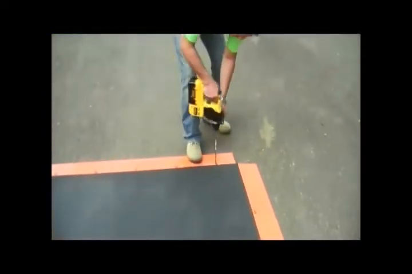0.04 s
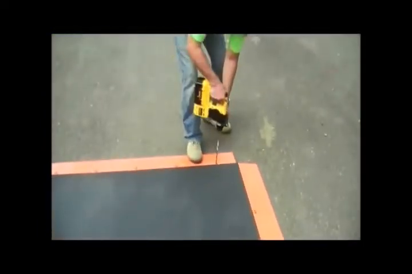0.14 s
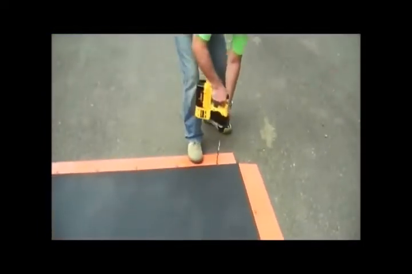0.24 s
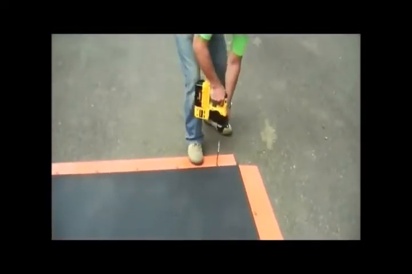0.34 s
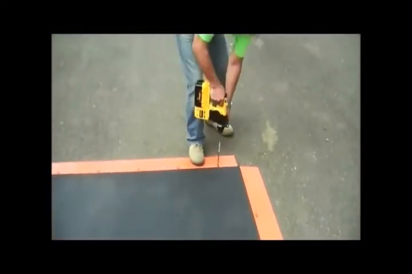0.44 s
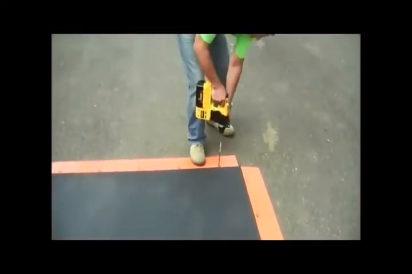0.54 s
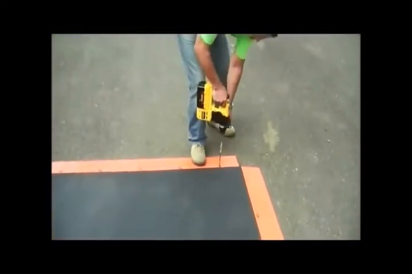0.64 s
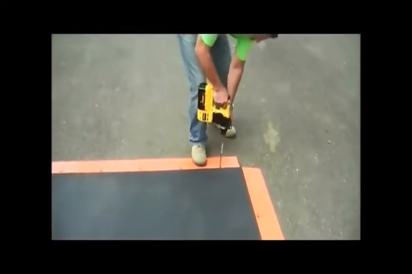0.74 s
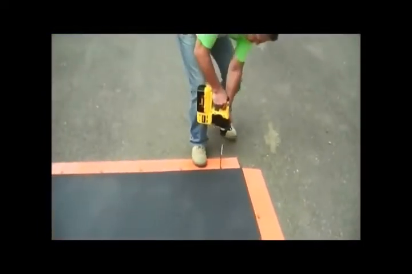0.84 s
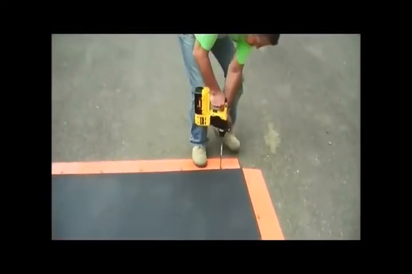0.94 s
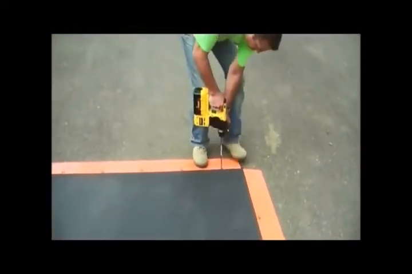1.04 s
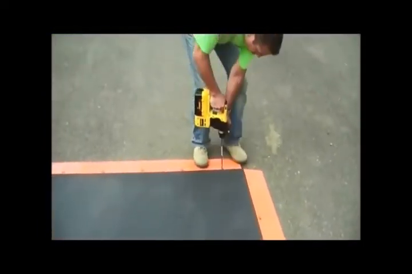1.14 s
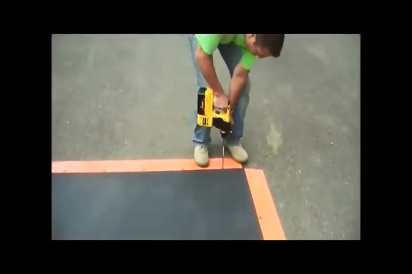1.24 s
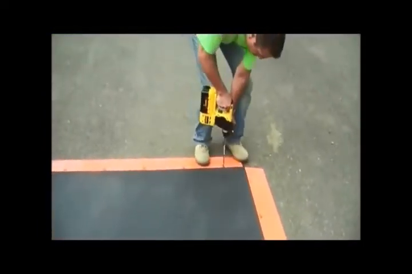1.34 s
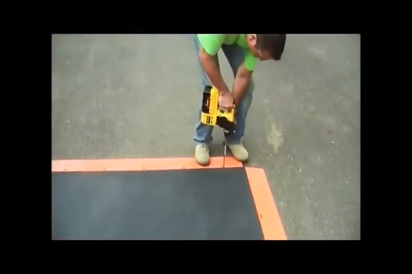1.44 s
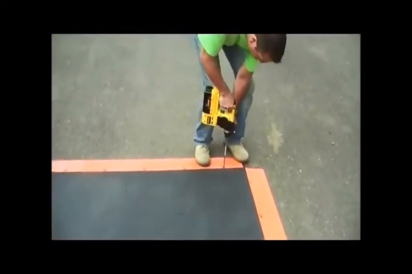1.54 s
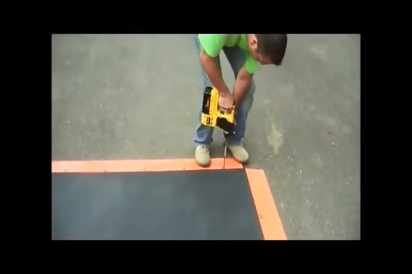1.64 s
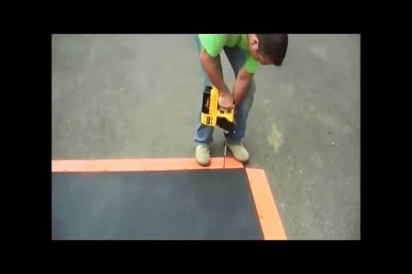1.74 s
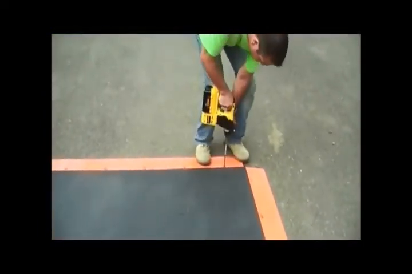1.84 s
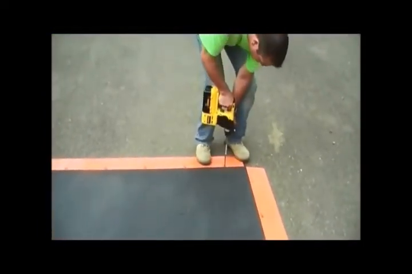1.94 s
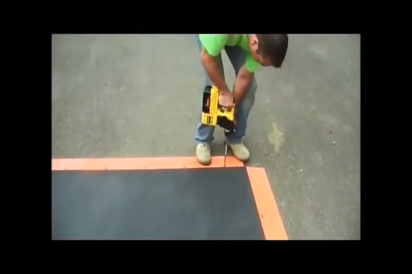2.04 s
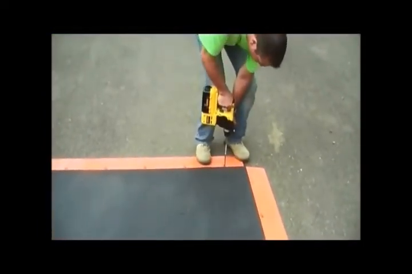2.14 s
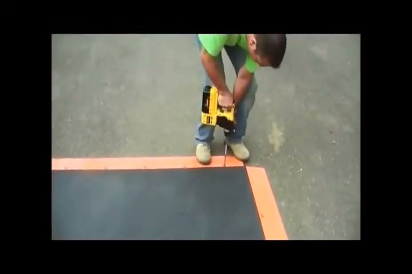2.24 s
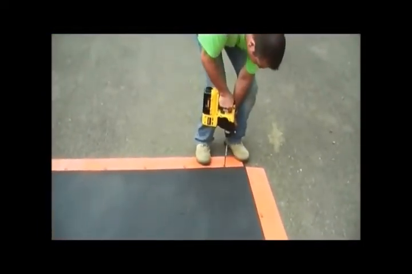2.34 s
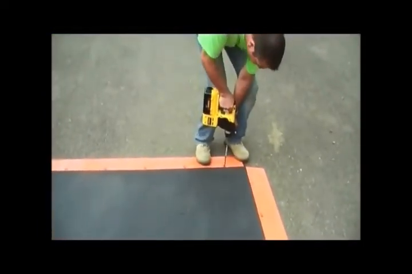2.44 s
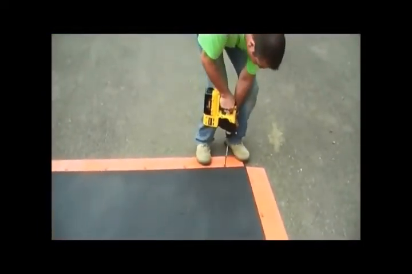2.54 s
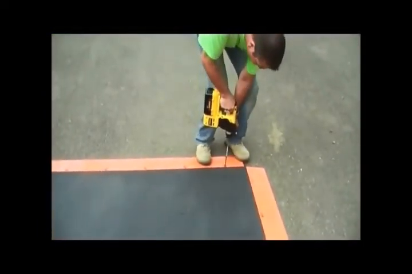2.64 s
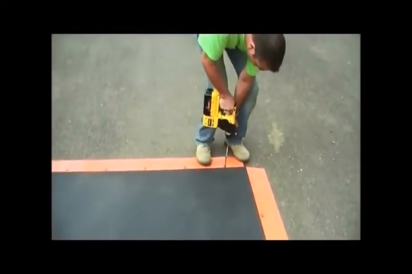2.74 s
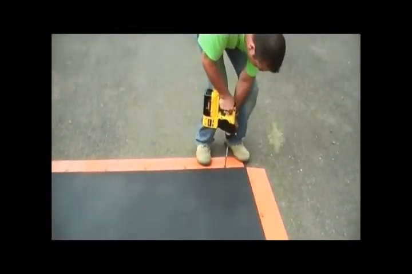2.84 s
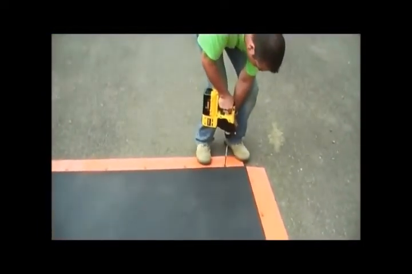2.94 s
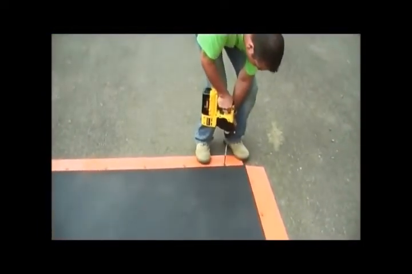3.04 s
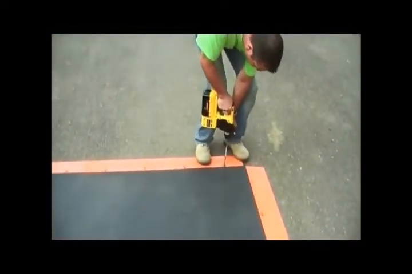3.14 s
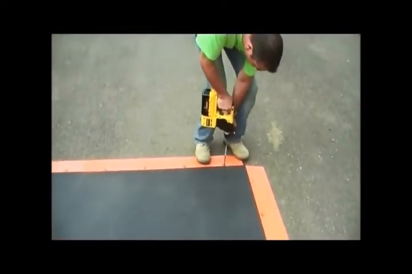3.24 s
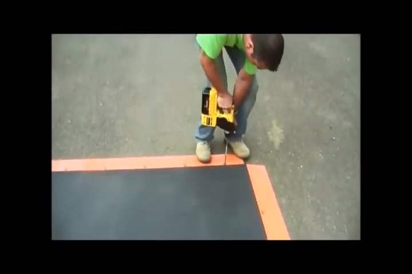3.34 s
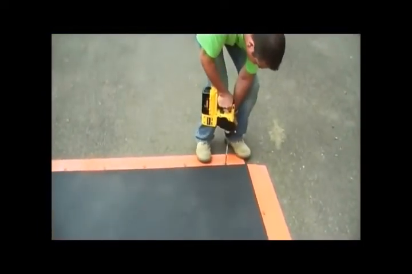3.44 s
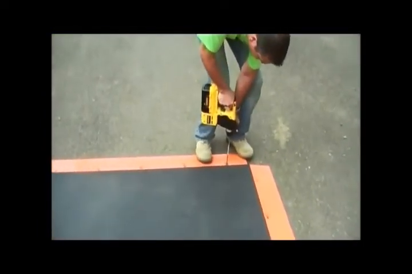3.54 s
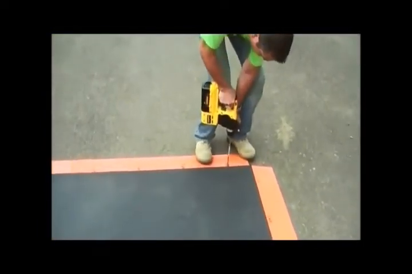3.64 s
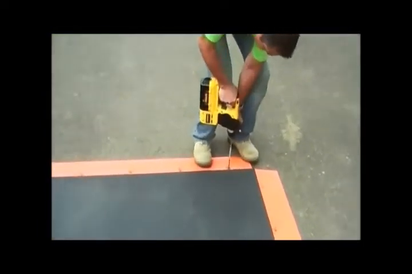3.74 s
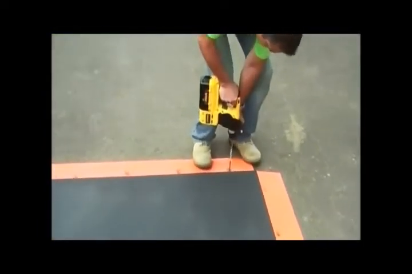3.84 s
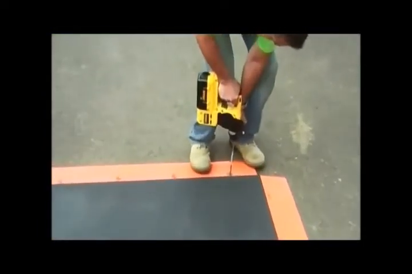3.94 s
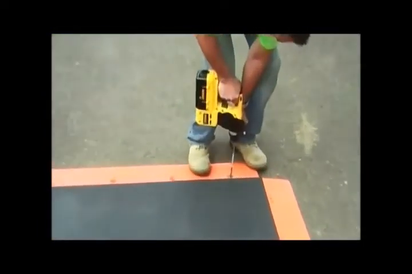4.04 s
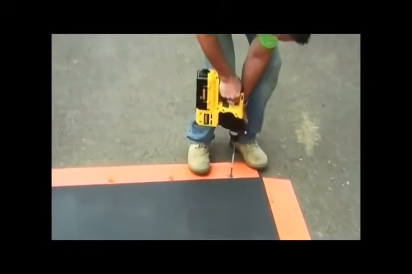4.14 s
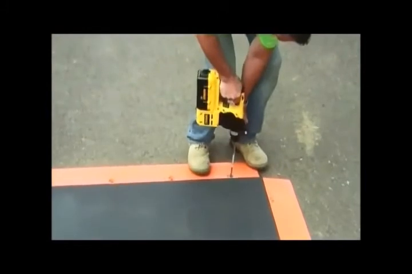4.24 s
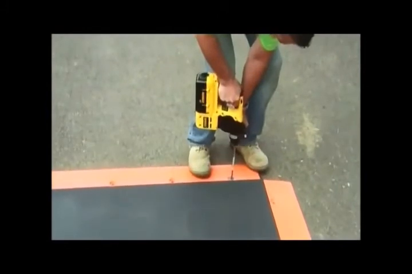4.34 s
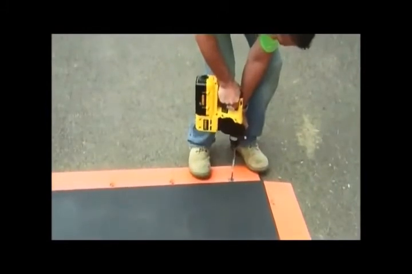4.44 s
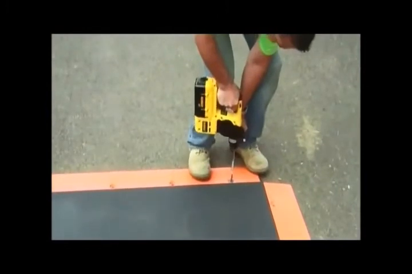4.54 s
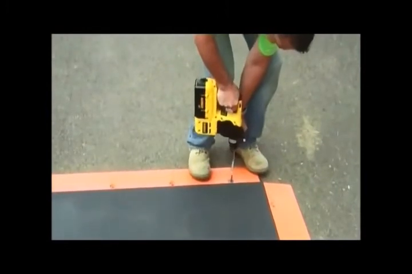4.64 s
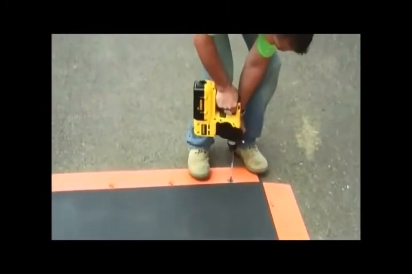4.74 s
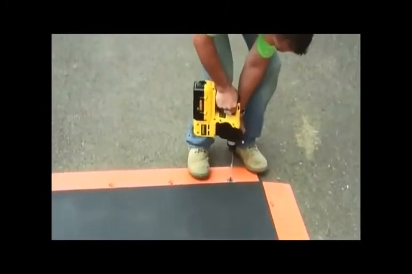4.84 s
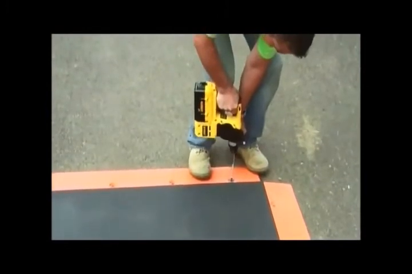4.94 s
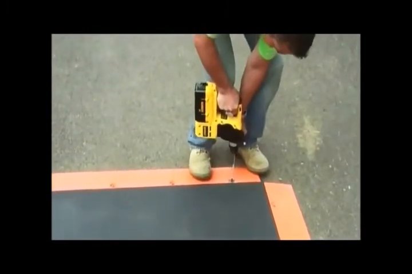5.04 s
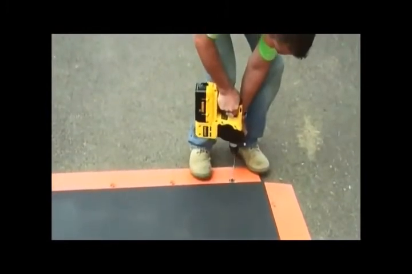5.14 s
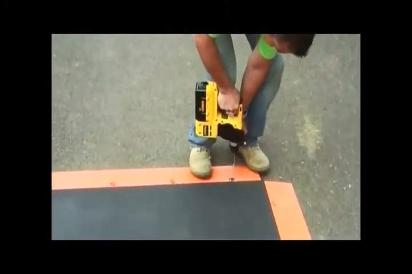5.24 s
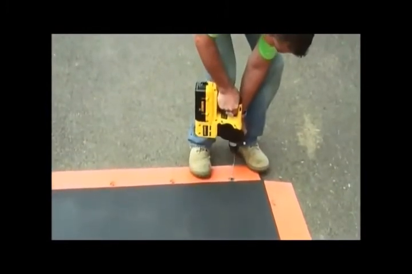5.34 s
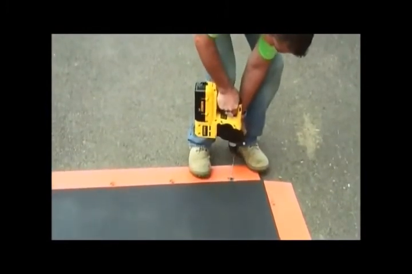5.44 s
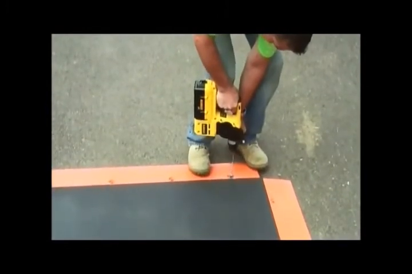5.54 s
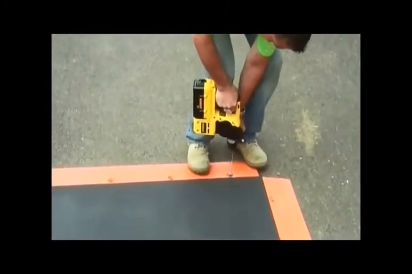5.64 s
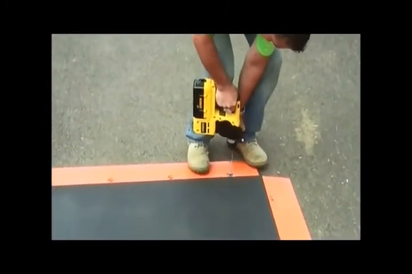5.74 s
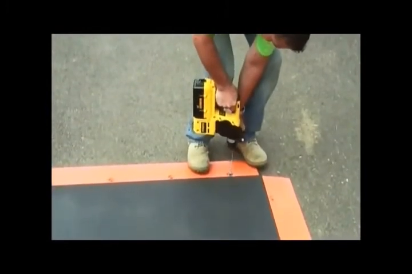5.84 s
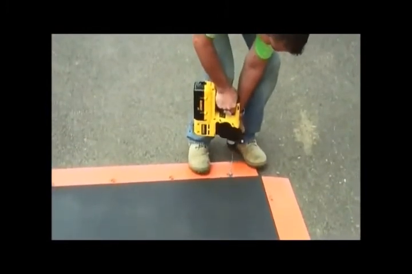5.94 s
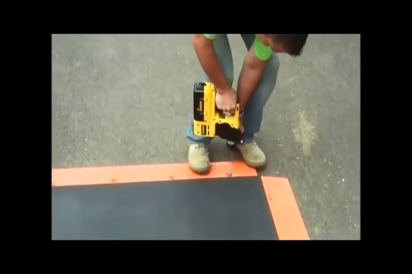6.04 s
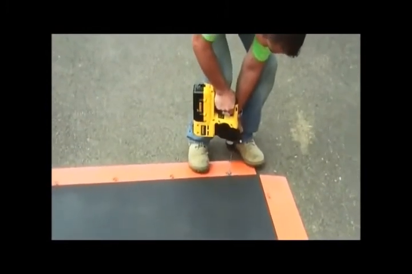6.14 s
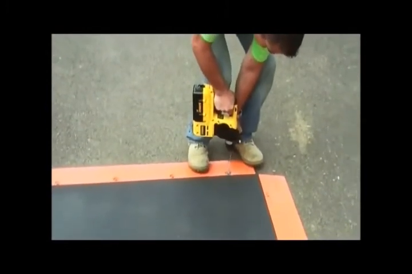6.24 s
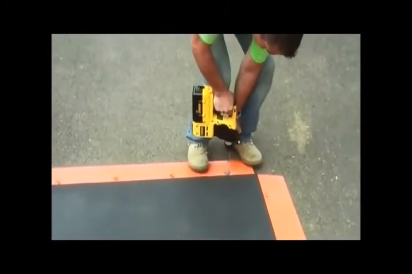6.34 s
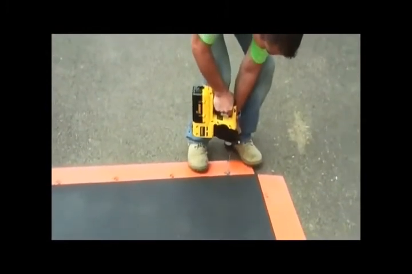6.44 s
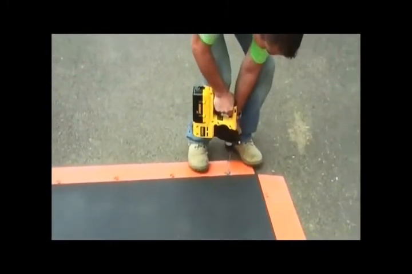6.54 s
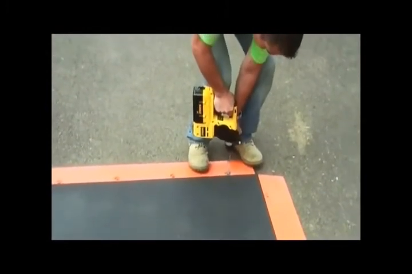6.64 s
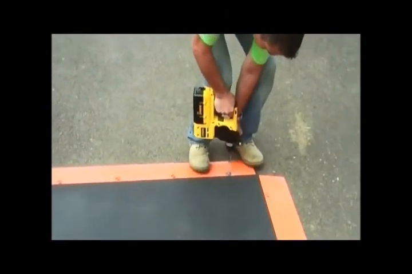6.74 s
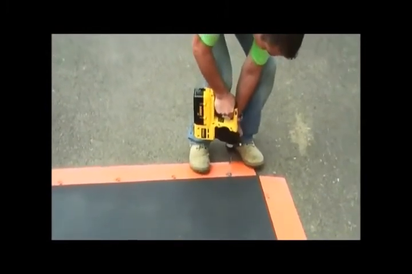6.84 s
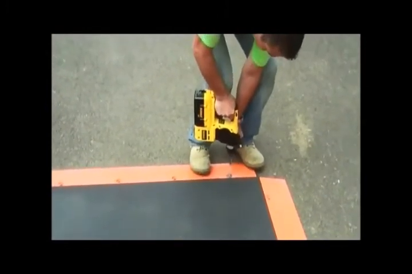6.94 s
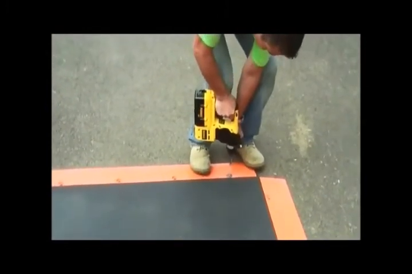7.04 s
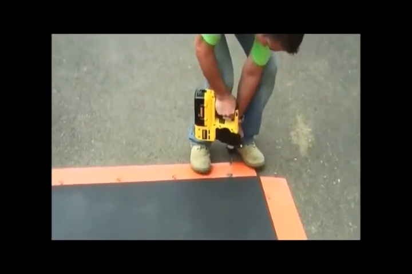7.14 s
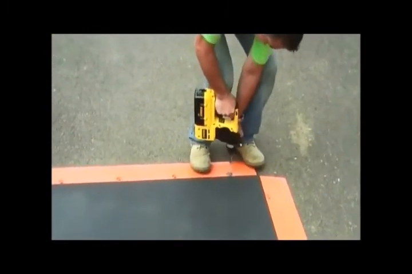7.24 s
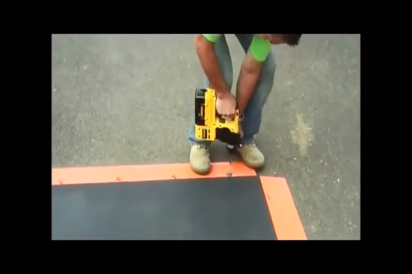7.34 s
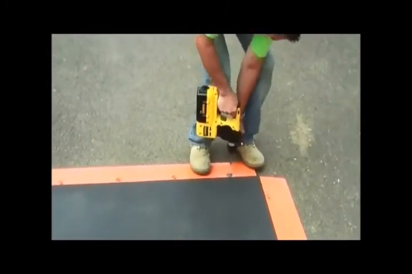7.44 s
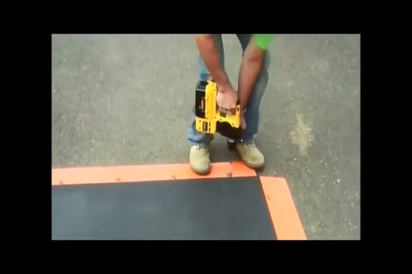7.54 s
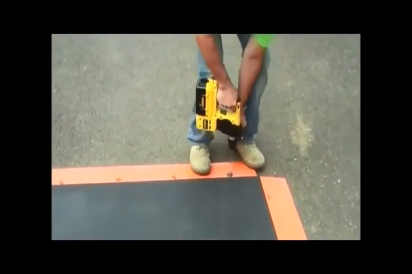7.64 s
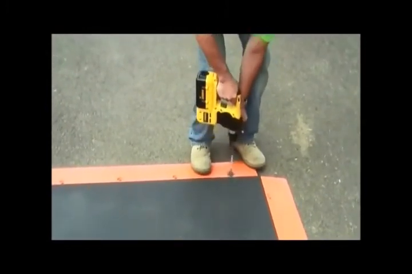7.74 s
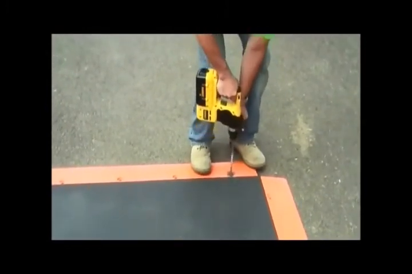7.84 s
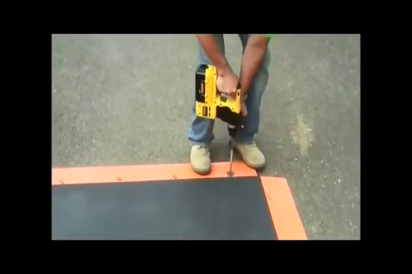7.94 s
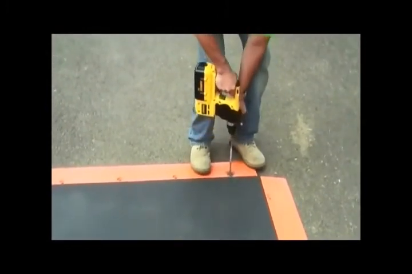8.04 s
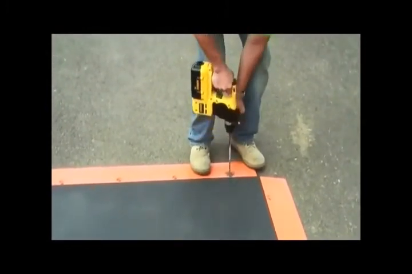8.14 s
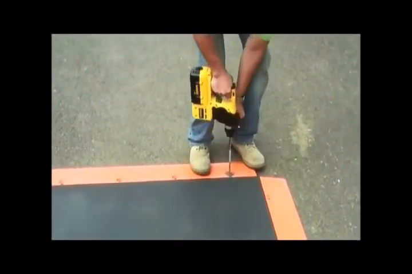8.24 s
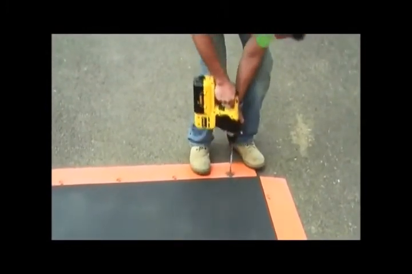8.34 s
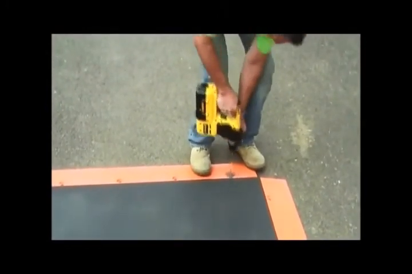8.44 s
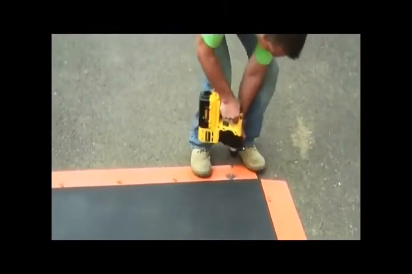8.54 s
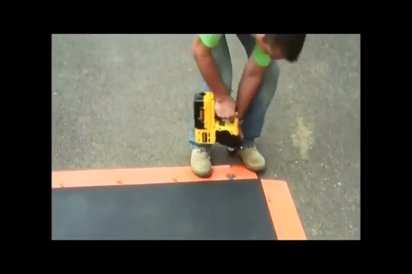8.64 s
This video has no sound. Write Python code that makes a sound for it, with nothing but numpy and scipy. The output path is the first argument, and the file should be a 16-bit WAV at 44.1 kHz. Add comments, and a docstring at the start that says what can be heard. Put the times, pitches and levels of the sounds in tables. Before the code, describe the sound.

Outdoors, close stereo: small metal ticks, one quick motor blip with a thin coasting whistle, then continuous hammer drilling into hard pavement. Buzzing blows start sharp and chip stone, becoming duller and grittier with depth. A brief choking lurch drops the motor speed before steady deep grinding. The bit lifts with a rising whir and clinks, knocks the rim, and scrapes squealing back in, still running at the end.

```python
"""Hammer drill in pavement, outdoors

A cordless hammer drill bores into pavement, close by, heard in stereo. After a few ticks and a blip of the trigger
the hammer cracks away at the surface: noise bursts, one a turn, over a filtered thud and surging grit. The blows dull
as the bit sinks; it binds and nearly stalls, grinds on deeper, and speeds up as it is drawn out and pushed back to
clear the dust. Noise and blows ring the bit's resonances, gears whine as sines through the housing's filter,
the ground scatters the sound by short noise tails, and a soft wash of filtered noise lies behind.
"""
import sys
import numpy as np
from scipy import signal
from scipy.fft import rfft, irfft
from scipy.io import wavfile
from scipy.ndimage import uniform_filter1d

SR = 44100
rng = np.random.default_rng(int(sys.argv[2]) if len(sys.argv) > 2 else 0)


def inscribe(sig):
    """Save sig as 16-bit PCM at rate SR to the path in sys.argv[1].

    A 1-D sig is mono; a 2-D sig holds one channel per row.
    Samples are clipped to [-1, 1] before scaling.
    """
    pcm = np.round(np.clip(np.atleast_2d(sig).T, -1, 1) * 32767)
    wavfile.write(sys.argv[1], SR, pcm.astype(np.int16))


N = 383669
TIME = np.arange(N) / SR  # seconds

# Motor under the changing load, before run-up and stall. Each row: time in s, hammer blows per s.
SPEED = [(1.1, 45.92), (1.34, 78.43), (1.56, 74.31), (1.99, 69.48), (2.54, 71.41), (3.65, 66.77),
         (4.02, 63.05), (4.31, 69.81), (4.56, 60.55), (5.05, 57.59), (5.16, 60.62), (6.86, 57.2),
         (7.08, 59.94), (7.59, 57.12), (7.71, 66.5), (8.02, 80), (8.34, 73.5), (8.7, 82.6)]
# How deep the bit is buried. Each row: time in s, share 0-1.
DEPTH = [(1.1, 0.04), (2.6, 0.4), (3.6, 0.69), (4.2, 0.58), (4.3, 0.13), (4.47, 0.16), (4.6, 0.89),
         (5.2, 0.86), (8.7, 0.96)]
# The trigger is pulled and the motor runs up by a power law.
START_S, SPIN_UP_S, SPIN_UP_POWER = 1.1, .13, .59
# Near stall: starts, slowest, recovers from, ends, all in s; then the share of speed lost.
STALL, STALL_LOSS = (4.37, 4.5, 4.5, 4.64), .36

# Stages of the job. Each holds: starts, full, fades from, ends, all in s.
# The tip hits the unbroken surface [s].
BARE_STONE = (1.1, 1.14, 1.21, 1.36)
# The bit strains against the side of the hole [s].
STRAIN = (2.8, 3.249, 3.9, 4.4)
# The bit catches in the hole [s].
BIND = (4.21, 4.28, 4.481, 4.53)
# It stops cutting [s].
CHOKE = (4.33, 4.49, 4.535, 4.601)
# The motor labours through the bind and back up to speed [s].
LABOUR = (4.2, 4.398, 4.8, 5.35)
# The load comes off and the motor revs up [s].
RELEASE = (7.552, 7.69, 7.82, 8.08)
# The bit is drawn out and runs free [s].
LIFT = (7.62, 7.78, 8.05, 8.35)
# It chatters on the rim [s].
RIM = (7.95, 8.08, 8.2, 8.36)
# It slides down the finished hole [s].
PLUNGE = (8.1, 8.38, 8.5, 8.85)

# Layer levels. Each entry: stage of the job, what it adds in dB ("boring" always applies).
# Thud of the ground [dB].
THUD_DB = dict(boring=-3, depth=1, bind=-21, choke=-6, lift=-3, plunge=-25)
# Grinding at the tip [dB].
GRIND_DB = dict(boring=0.39, choke=-8.5, lift=-2, rim=3.5)
# Crack of the blows [dB].
CRACK_DB = dict(boring=-20.5, depth=-6.5, bind=-16, choke=-10, lift=-15, plunge=-52, rim=13)
# Low gear hum [dB].
HUM_DB = dict(boring=-26, shallow=-27.5, choke=-23, labour=-4.5, plunge=-14.5)
# High gear whine [dB].
WHINE_DB = dict(boring=-24.5, shallow=-15, labour=-15, release=6.5, lift=1.5, plunge=-0.5)
# Singing of the bit [dB].
SING_DB = dict(boring=-7, bind=0, choke=-15.5, labour=2)
# Weight on the drill, heard in the thud before its layer level. Each row: time in s, level in dB.
PUSH = [(1.19, -29.5), (1.45, -36.5), (2.0, -28.5), (2.65, -25.5), (3.42, -26), (3.9, -37), (4.35, -42),
        (4.62, -30.5), (7.6, -38.5), (8.7, -43)]
# Grinding before its layer level. Each row: time in s, level in dB.
GRIND = [(1.1, -33), (1.17, -15), (1.32, -21), (1.52, -22), (2.65, -18), (4.3, -18.5), (6.0, -16),
         (7.8, -18), (8.7, -19.5)]

# Colour of the bit's crack. Each row: frequency in Hz, level in relative dB.
CRACK = [(300, -23), (1000, -33), (3500, -13), (5200, -8), (6300, 3.5), (7700, 3), (8700, -6), (9700, -6.5),
         (11000, -15), (13000, -47)]
# Thud of the ground at a shallow hole. Each row: frequency in Hz, level in relative dB.
THUD = [(40, -16), (130, -46), (210, -26), (290, -25), (400, -5.5), (490, 2), (560, -5), (720, 9),
        (860, -3.5), (1020, -0.5), (1200, -25), (1500, -15), (2500, -32)]
# Thud from a deep hole. Each row: frequency in Hz, level in relative dB.
DEEP_THUD = [(40, -22), (130, -21.5), (175, -11.5), (240, -16.5), (345, 1.5), (415, 5), (520, -14),
             (700, 5.5), (900, -47), (1200, -9), (2500, -22.5)]
# Grinding in a shallow hole. Each row: frequency in Hz, level in relative dB.
SHALLOW_GRIND = [(30, -29), (170, -18), (300, -0.5), (550, -3), (720, 10), (1010, 8.5), (1250, 1),
                 (1500, -0.5), (1900, 17), (2260, 5), (2700, 7), (4000, 2), (4500, 8.5), (5300, -2.5),
                 (6000, 2), (7300, -2), (10000, -8), (12500, -15)]
# Grinding in a deep hole. Each row: frequency in Hz, level in relative dB.
DEEP_GRIND = [(30, -42), (200, -24), (350, -8), (540, -9), (720, 0.5), (880, 8), (1030, 12), (1230, -2.5),
              (1550, 7.5), (1800, 10.5), (2000, 6), (2500, 7.5), (4000, 6), (4900, 4.5), (5300, 5),
              (5800, 3.5), (6400, 1.5), (7100, 1), (9000, -7), (12500, -21.5)]
# The ram's stroke in turns: lag behind the crack, how much earlier at full depth, width, rebound.
STROKE_LAG, STROKE_LEAD, STROKE_WIDTH, REBOUND_TURN = .14, .26, .14, .42
REBOUND_SHARE = .4  # pressure of the rebound at full depth
# How far pressure swells the low crunch of the grit and its hiss, and where the two meet.
CRUNCH_SURGE, HISS_SURGE, CRUNCH_HZ = 1.6, .5, 1500

# Hard blows: force on the surface and in the bind, and their spread, in dB before the last filter.
SURFACE_DB, BINDING_DB, HARD_SPREAD_DB = 10.5, 7, 1.0
SNAP_HZ, SNAP_WIDTH_HZ = 7150, 2400
# In the bind each blow drags on the wall and weakens as the motor chokes.
DRAG_S, BINDING_CHOKE_DB = .0013, -3.5
# Ring of the jammed bit. Each row: frequency in Hz, width in Hz, level in dB.
BINDING_MODES = [(2080, 300, -1), (5750, 1500, 1.5)]
# Single blows that break off a chip. Each row: time in s, force in relative dB.
CHIPS = [(1.374, 4), (1.502, 6), (1.557, 6), (1.597, 11), (1.625, 6), (1.666, 6), (2.386, 5), (2.498, 4),
         (3.051, 4)]

# The bit sings against the wall of the hole. Each row: time in s, pitch in Hz, level in dB before stages.
SINGING = [(1.1, 2030, -33), (1.17, 2060, -15.5), (1.5, 1956, -27.5), (2.7, 2010, -20.5), (3.4, 2037, -13),
           (4.0, 1987, -14.5), (4.59, 2060, -17.5), (4.75, 2086, -16.5), (5.3, 2167, -19.5),
           (7.6, 2210, -25), (7.8, 2183, -75)]
# It squeals on the wall going back down. Each row: time in s, pitch in Hz, level in dB.
SQUEAL_GLIDE = [(7.98, 1800, -56), (8.06, 1800, -24), (8.36, 1730, -19.5), (8.46, 1740, -17),
                (8.54, 1920, -15.5), (8.62, 1890, -20), (8.7, 2100, -22)]
# Upper modes of bit and chuck. Each row: frequency in Hz, width in Hz, level in dB against the grinding,
# dB added when shallow, dB added when straining, dB added when plunging.
BIT_MODES = [(2585, 106, -15.5, 8.5, -1, 13.5), (3204, 81, -24, -9, 11, 5.8), (4270, 250, -15.5, 0, -5, 6),
             (5655, 150, -17, 5, -1, 7), (7190, 160, -17.5, -7, 4.5, 5.7)]
SING_WIDTH_HZ, SQUEAL_WIDTH_HZ = 115, 160
SING_THROB = .4  # power of the surge by which the singing throbs
STRUCK_SHARE = 1.1  # clean blow against scraping grit in what drives the modes

# Gear mesh. Each row: multiple of the hammer rate, level in relative dB.
MESH = [(12, 0), (18, -5), (23.9, 5), (30.3, 15), (36.5, 10), (42.3, 2.5), (59.5, 6)]
# What the housing lets out of the low mesh tones. Each row: frequency in Hz, gain in relative dB.
HUM = [(550, -10), (770, -23.5), (880, 3), (1090, -4.5), (1180, -10.5), (1500, -38.5), (3000, -30)]
# What the housing lets out of the high mesh tones. Each row: frequency in Hz, gain in relative dB.
WHINE = [(1100, -44), (1400, 3), (1560, 1.5), (1780, -3), (2050, -12), (2300, -2), (2600, 10), (2850, 4),
         (3300, -21), (4000, -21), (4350, 10), (5000, -9), (7000, -38)]
HUM_BACKLASH = .35  # share of the gears' backlash that reaches the low hum

# The lifted bit clinks loose in the chuck. Each row: time in s, level in dB.
CLINKS = [(7.754, -18), (7.769, -12), (7.798, -15), (7.825, -21), (7.840, -20), (7.893, -20),
          (7.907, -12.5), (7.926, -23), (7.949, -16), (7.974, -17), (7.987, -21), (8.027, -12),
          (8.052, -16), (8.078, -12), (8.144, -18), (8.209, -10)]
# Ring of the loose bit. Each row: frequency in Hz, width in Hz, level in relative dB.
CLINK_MODES = [(4400, 260, 0), (4950, 200, -10), (5780, 160, -4)]
CLINK_DECAY_S = .0055
LOOSE_DB = -27  # its buzz between the clinks
# The drill knocks on the rim going back down. Each row: time in s, strength in relative dB.
KNOCKS = [(8.2, -15.5), (8.221, -20), (8.235, -20)]
# Hollow modes of that knock. Each row: frequency in Hz, width in Hz, level in relative dB.
KNOCK_MODES = [(303, 40, -0.5), (485, 54, -5), (700, 160, -7)]

# Bit and trigger tick while the drill is placed. Each row: time in s, level in relative dB.
TICKS = [(0.074, -13.5), (0.113, -14.5), (0.131, -27), (0.74, -10)]
# Colour of the ticks. Each row: frequency in Hz, level in relative dB.
TICK_COLOUR = [(200, -23), (900, -6), (2000, 1), (8000, -1), (12000, -33)]
# The blip of the trigger. Each row: time in s, level in relative dB.
BLIP = [(.425, -90), (.437, -41), (.453, -32), (.457, -11.5), (.476, -15.5), (.481, -24), (.5, -36.5),
        (.56, -42), (.66, -58)]
# Colour of the blip. Each row: frequency in Hz, level in relative dB.
BLIP_COLOUR = [(59, -61), (100, -28), (1000, -5.5), (1380, -17), (1520, -14), (2140, -13), (2320, -11),
               (5830, -11.5), (12000, -41)]
# The motor coasts after the blip. Each row: time in s, whistle in Hz, level in dB.
COAST = [(.5, 3900, -62), (.54, 3650, -48), (.66, 3400, -46.5), (.7, 3280, -49), (.76, 3220, -68)]
# Width of the housing's ring in the blip, and of the scratchy whistle after it.
BLIP_RING_WIDTH_HZ, COAST_WIDTH_HZ = 90, 220

# Ground scatter against the direct sound. Each row: frequency in Hz, level in dB.
SCATTER = [(60, -4), (280, -10), (1000, -10.5), (2000, -8.5), (4500, -8.5), (8500, -5.5)]
# Left channel against right. Each row: frequency in Hz, left minus right in dB.
LEAN = [(100, 0.5), (300, 1), (700, 4), (1400, 5), (2800, 1), (5500, -0.3), (10000, 2)]
# Outdoor wash. Each row: frequency in Hz, level in relative dB.
AIR = [(24, -50), (40, -29), (245, -4.5), (456, -3.5), (700, 3.5), (950, 3.5), (1300, -2), (3470, -9),
       (5330, -2.5), (12000, -35)]
AIR_DB = -51  # nominal, before the shared and separate parts add up
CUTOFF_HZ = 13300


def hammer(blow, age, landing, pressure, state):
    """One blow a turn: the bit cracks, the ground thuds and crushed grit surges, most in its low crunch."""
    depth = state["depth"]
    # every blow differs a little in crack level, timing and thud level
    crack_chance, time_chance, thud_chance = rng.standard_normal((blow[-1] + 1, 3))[blow].T
    strike = from_db(2 * crack_chance) * burst(age + .0003 * time_chance, .0004, .0007)
    crack = even(colour(strike * white(), CRACK)) * level(CRACK_DB, state)

    push = landing * from_db(.5 * thud_chance)
    thud = rms_one(push) + .35 * rms_one(pressure * white())
    thud = blend(thud, THUD, DEEP_THUD, depth ** 4)
    thud = thud * from_db(in_time(PUSH)[0]) * level(THUD_DB, state)

    grit = 0
    for side, surge in (("low", CRUNCH_SURGE), ("high", HISS_SURGE)):
        crossover = signal.butter(2, CRUNCH_HZ, side, fs=SR, output="sos")
        grit = grit + signal.sosfilt(crossover, even(white() * (1 + surge * pressure)))
    grind = blend(grit, SHALLOW_GRIND, DEEP_GRIND, depth)
    grind = grind * from_db(in_time(GRIND)[0]) * level(GRIND_DB, state)

    landed = blow > 0
    return landed * (crack + thud) + grind


def hard_blows(blow, age, state):
    """Steel on stone: bright snaps at the surface and on chips, lower, longer drags while the bit binds."""
    spread = from_db(HARD_SPREAD_DB * rng.standard_normal(blow[-1] + 1))[blow]
    force = (blow > 0) * spread * white()
    chipped = sum(from_db(db) * (blow == blow[int(s * SR)]) for s, db in CHIPS)
    snap_force = stage(BARE_STONE) ** 2 * from_db(SURFACE_DB) + chipped
    snaps = force * burst(age, .0003, .0007) * snap_force
    drag_force = state["bind"] ** 4 * from_db(BINDING_DB + BINDING_CHOKE_DB * state["choke"])
    drags = force * burst(age, DRAG_S, DRAG_S) * drag_force
    rings = resonate(snaps, [(SNAP_HZ, SNAP_WIDTH_HZ, 0)]) + resonate(drags, BINDING_MODES)
    return colour(rings, [(7900, -3.5), (8700, -10), (9800, -13), (12500, -12)])


def stroke(turns, state):
    """The ram's cycle: the instant it lands, and the tip pressure that swells, eases and rebounds."""
    phase = turns - STROKE_LAG + STROKE_LEAD * state["depth"]
    landing = np.clip(np.diff(np.floor(phase + STROKE_WIDTH / 2), prepend=0), 0, 1)
    rebound = REBOUND_SHARE * state["depth"] * swell(phase, REBOUND_TURN, STROKE_WIDTH / 2)
    return landing, swell(phase, 0, STROKE_WIDTH) + rebound


def singing_bit(landing, surge, state):
    """Blows and grit ring the bit's modes while it bores; it squeals as it goes back down."""
    drive = STRUCK_SHARE * rms_one(landing) + rms_one(surge * white())
    throb = even(surge ** SING_THROB)
    grinding = from_db(in_time(GRIND)[0]) * state["spin"] ** 2
    hz, level_db = in_time(SINGING)
    song = sung(drive, hz, SING_WIDTH_HZ) * from_db(level_db) * level(SING_DB, state)
    for mode_hz, width_hz, db, shallow_db, strain_db, plunge_db in BIT_MODES:
        stage_db = dict(boring=db, shallow=shallow_db, strain=strain_db,
                        plunge=plunge_db, choke=SING_DB["choke"])
        song = song + sung(drive, mode_hz, width_hz) * level(stage_db, state) * grinding
    squeal_hz, squeal_db = in_time(SQUEAL_GLIDE)
    squeal = sung(drive, squeal_hz, SQUEAL_WIDTH_HZ) * from_db(squeal_db)
    return throb * (song + squeal)


def gears(speed, turns, surge, state):
    """Mesh tones follow the motor: a firm low hum, and a whine rough under load, cleaner when lifted."""
    load = 1 - state["lift"]
    wobble = speed * (.003 + .009 * load) * drift(70)
    shaken = turns + np.cumsum(wobble) / SR
    firm = rough = 0
    for multiple, level_db in MESH:
        backlash = (.5 + .25 * load) * drift(90)
        phase = 2 * np.pi * multiple * shaken
        firm = firm + from_db(level_db) * np.sin(phase + HUM_BACKLASH * backlash)
        rough = rough + from_db(level_db) * (1 + .5 * backlash) * np.sin(phase + backlash)
    hum = even(colour(firm * surge, HUM)) * level(HUM_DB, state)
    whine = even(colour(rough * surge, WHINE)) * level(WHINE_DB, state)
    return (hum + whine) * state["spin"] ** 2


def motor(state):
    """Hammer blows per second: run-up, load, and the near stall."""
    return in_time(SPEED)[0] * state["spin"] * (1 - STALL_LOSS * stage(STALL))


def job():
    """How far each stage of the job applies at every moment, 0-1."""
    depth = np.clip(in_time(DEPTH)[0], 0, 1)
    spin = np.clip((TIME - START_S) / SPIN_UP_S, 0, 1) ** SPIN_UP_POWER
    return dict(boring=1, spin=spin, depth=depth, shallow=(1 - depth) ** 2, strain=stage(STRAIN),
                bind=stage(BIND), choke=stage(CHOKE), labour=stage(LABOUR), release=stage(RELEASE),
                lift=stage(LIFT), rim=stage(RIM), plunge=stage(PLUNGE))


def clinks(state):
    """With no weight on it, the bit is knocked about in the chuck and rings briefly each time."""
    touches = contacts(CLINKS, .00054, CLINK_DECAY_S, before_s=.01, after_s=.1)
    buzz = from_db(LOOSE_DB) * state["lift"]
    return (touches + buzz) * even(resonate(white(), CLINK_MODES), size=200)


def knocks():
    """Each knock scuffs briefly and rings the hollow body, which is too small to radiate bass."""
    scuffs = contacts(KNOCKS, .0058, .0091, before_s=.05, after_s=.3)
    no_bass = signal.butter(5, 220, "high", fs=SR, output="sos")
    body = signal.sosfilt(no_bass, resonate(scuffs * white(), KNOCK_MODES))
    return from_db(-8) * body / np.abs(body).max()


def placing():
    """Small ticks of noise, one blip of the motor ringing the housing, and a thin whistle as it coasts."""
    touches = contacts(TICKS, .00019, .0037, before_s=.02, after_s=.2)
    ticks = .33 * colour(touches * white(), TICK_COLOUR)
    rush = rms_one(colour(white(), BLIP_COLOUR))
    ring = even(resonate(white(), [(994, BLIP_RING_WIDTH_HZ, 0)]), size=1000)
    blip = from_db(in_time(BLIP)[0]) * (.67 * rush + .36 * ring)
    coast_hz, coast_db = in_time(COAST)
    whistle = from_db(coast_db) * sung(white(), coast_hz, COAST_WIDTH_HZ)
    return ticks + blip + whistle


def outdoors(x, near_t60, far_db, far_t60, size=14000):
    """Each side gets direct sound, quick ground scatter that slowly shifts by chance, and a faint far tail."""
    age, ears = TIME[:size], []
    t60 = np.array([[near_t60], [near_t60], [far_t60]])
    for side in (1, -1):  # left, right
        tails = rng.standard_normal((3, size)) * from_db(-60 * age / t60)
        one, other, far = [signal.oaconvolve(x, tail / np.linalg.norm(tail))[:N] for tail in tails]
        angle = 2 * np.pi * drift(1)
        scatter = colour(one * np.cos(angle) + other * np.sin(angle), SCATTER)
        heard = x + scatter + from_db(far_db) * far
        ears.append(colour(heard, [(hz, side * db / 2) for hz, db in LEAN]))
    return np.array(ears)


def background():
    """Soft outdoor wash of noise with a narrow, steady sizzle, partly shared by the two sides."""
    wash = []
    for _ in range(3):  # shared, left, right
        sizzle = rms_one(resonate(white(), [(5270, 280, 0)]))
        wash.append(rms_one(colour(white(), AIR)) + from_db(-8) * sizzle)
    return from_db(AIR_DB) * (1.08 * wash[0] + .99 * np.array(wash[1:]))


def from_db(db):
    """Decibels to gain."""
    return 10 ** (np.asarray(db) / 20)


def rms_one(x):
    """Scale to unit power."""
    return x / np.sqrt(np.mean(x ** 2) + 1e-20)


def even(x, size=8000):
    """Hold the running power at 1, over a window of size samples."""
    return x / np.sqrt(np.maximum(uniform_filter1d(x * x, size), 1e-12))


def in_time(rows):
    """Each column of a curve at every sample."""
    s, *columns = np.transpose(rows)
    return [np.interp(TIME, s, c) for c in columns]


def stage(times):
    """Rise from 0 to 1, hold, fall back."""
    return np.interp(TIME, times, [0, 1, 1, 0])


def level(stage_db, state):
    """Gain of a layer: every stage adds its dB as far as it applies."""
    return from_db(sum(db * state[name] for name, db in stage_db.items()))


def white():
    """White noise."""
    return rng.standard_normal(N)


def drift(rate):
    """Smooth chance of spread 1, changing about rate times a second."""
    r = np.exp(-2 * np.pi * rate / SR)
    # the first second lets the filter settle
    return rms_one(signal.lfilter([1], [1, -2 * r, r * r], rng.standard_normal(N + SR))[SR:])


def burst(age, rise_s, decay_s):
    """Envelope of a blow: swells until age 0, then dies."""
    return np.exp(-np.maximum(age, 0) / decay_s + np.minimum(age, 0) / rise_s)


def contacts(rows, rise_s, decay_s, before_s, after_s):
    """Summed envelopes of single touches, each row (s, dB)."""
    return sum(from_db(db) * burst(np.clip(TIME - s, -before_s, after_s), rise_s, decay_s) for s, db in rows)


def swell(phase, centre, width):
    """A smooth bump once in every turn."""
    return np.exp(-.5 * (((phase - centre + .5) % 1 - .5) / width) ** 2)


def colour(x, spectrum, size=4096):
    """Causal (minimum-phase) filter with the given spectrum, by way of the cepstrum."""
    hz, level_db = np.transpose(spectrum)
    grid = np.maximum(np.arange(size // 2 + 1) * SR / size, 1)
    cepstrum = irfft(np.log(from_db(np.interp(np.log(grid), np.log(hz), level_db))))
    cepstrum[1:size // 2] *= 2
    cepstrum[size // 2 + 1:] = 0
    return signal.oaconvolve(x, irfft(np.exp(rfft(cepstrum))))[:N]


def blend(x, shallow, deep, depth):
    """The colour changes as the bit sinks; the power stays 1."""
    return even((1 - depth) * rms_one(colour(x, shallow)) + depth * rms_one(colour(x, deep)))


def resonate(x, modes):
    """Parallel resonances of (Hz, width in Hz, dB), signs alternating."""
    out = 0
    for k, (hz, width, level_db) in enumerate(modes):
        r = np.exp(-np.pi * width / SR)
        band = signal.lfilter([1, 0, -1], [1, -2 * r * np.cos(2 * np.pi * hz / SR), r * r], x)
        out = out + (-1) ** k * from_db(level_db) * (1 - r * r) / 2 * band
    return out


def sung(drive, hz, width_hz):
    """One narrow resonance, of steady or moving pitch, kept ringing by the drive; power 1."""
    r = np.exp(-np.pi * width_hz / SR)
    carrier = np.exp(2j * np.pi * np.cumsum(hz + np.zeros(N)) / SR)
    # shift the pitch down to 0 Hz, smooth there, shift back up
    swing = signal.lfilter([1], [1, -2 * r, r * r], drive / carrier)
    return even(np.real(swing * carrier), size=1500)


def scene():
    """The drill on the pavement, in the open air."""
    state = job()
    speed = motor(state)
    turns = np.cumsum(speed) / SR
    blow = np.round(turns).astype(int)  # number of the nearest blow
    age = (turns - blow) / np.maximum(speed, 1)  # seconds since that blow, negative ahead of it
    landing, pressure = stroke(turns, state)
    surge = 1 + pressure

    boring = hammer(blow, age, landing, pressure, state) + hard_blows(blow, age, state)
    boring = boring + gears(speed, turns, surge, state) + singing_bit(landing, surge, state)
    running = np.clip((TIME - START_S) / .008, 0, 1)
    drill = running * boring + clinks(state) + knocks() + placing()
    return outdoors(drill, near_t60=.012, far_db=-16, far_t60=.2) + background()


def record(dry):
    """At the microphone the highest peaks are rounded and the top of the treble is cut."""
    rounded = dry / (1 + (dry / .92) ** 6) ** (1 / 6)
    return signal.sosfilt(signal.cheby2(14, 70, CUTOFF_HZ, fs=SR, output="sos"), rounded)


dry = scene()
out = record(dry)
inscribe(out)
```